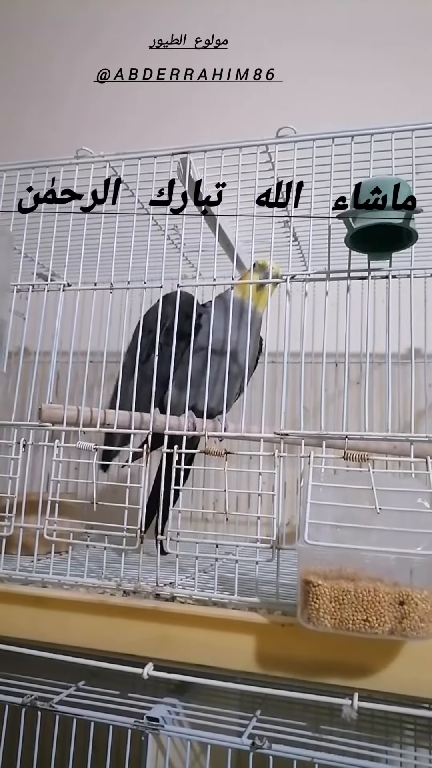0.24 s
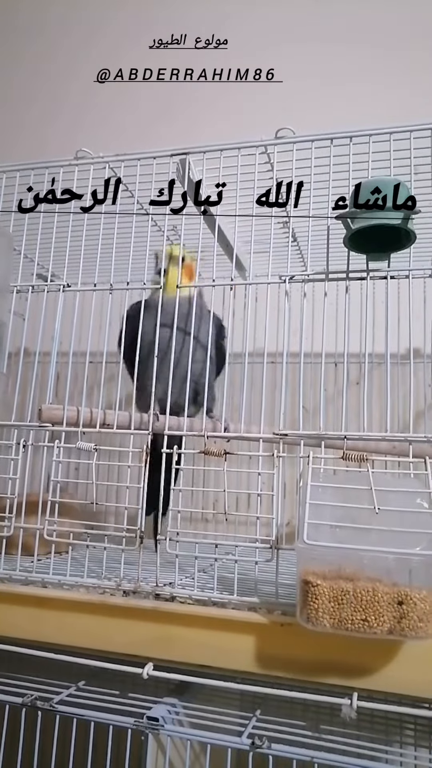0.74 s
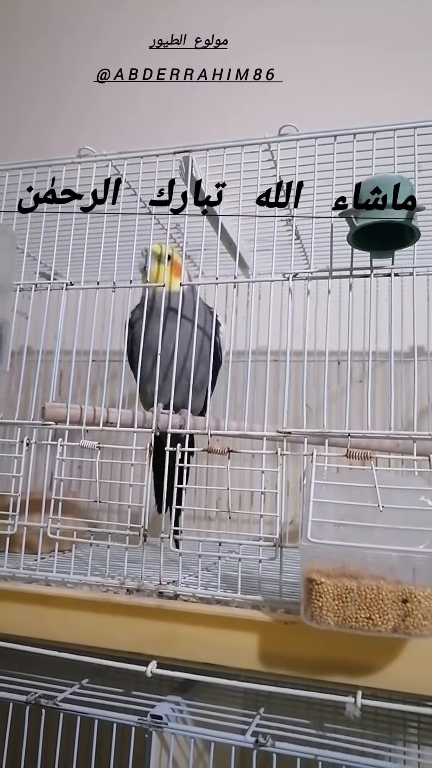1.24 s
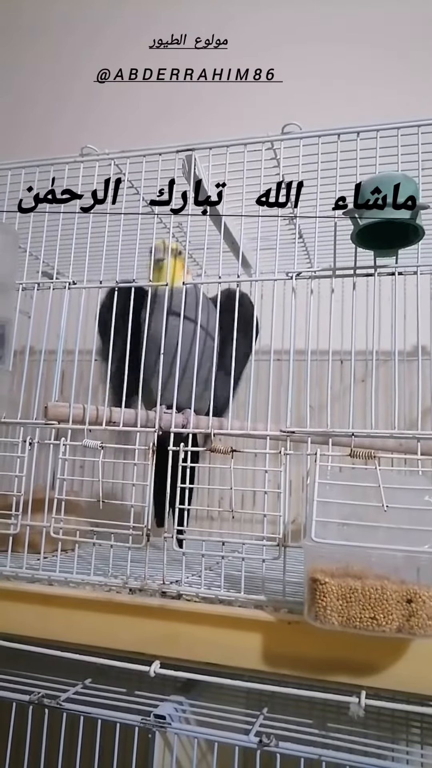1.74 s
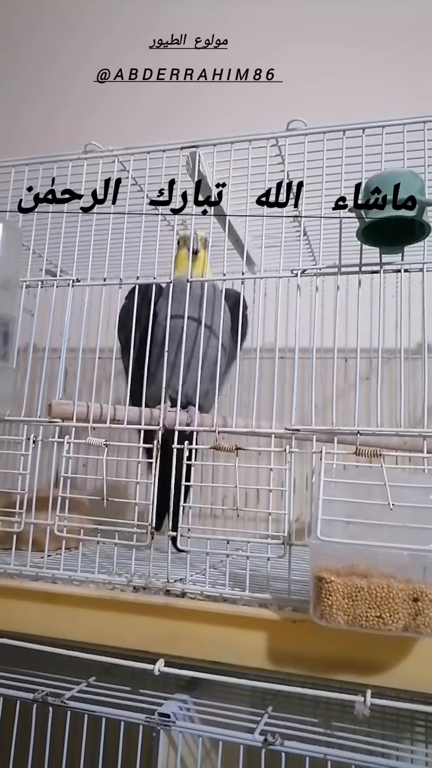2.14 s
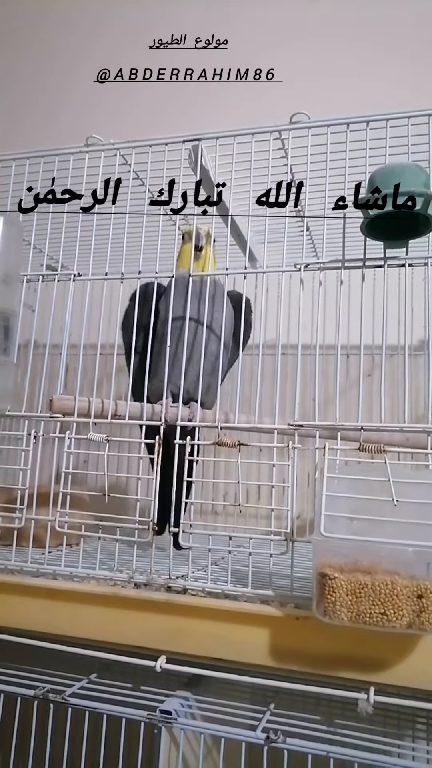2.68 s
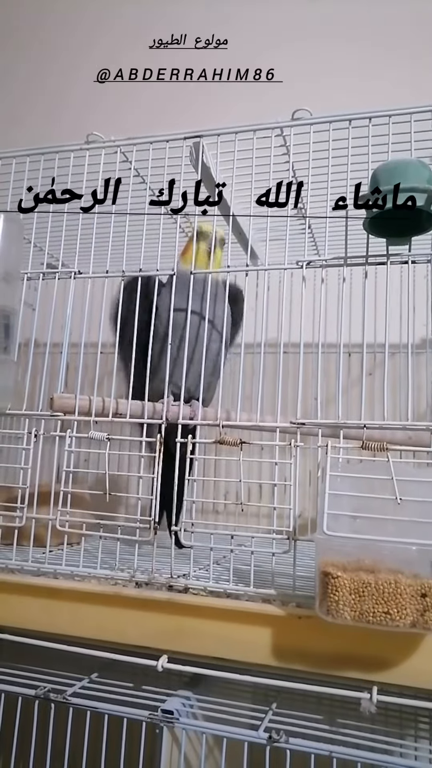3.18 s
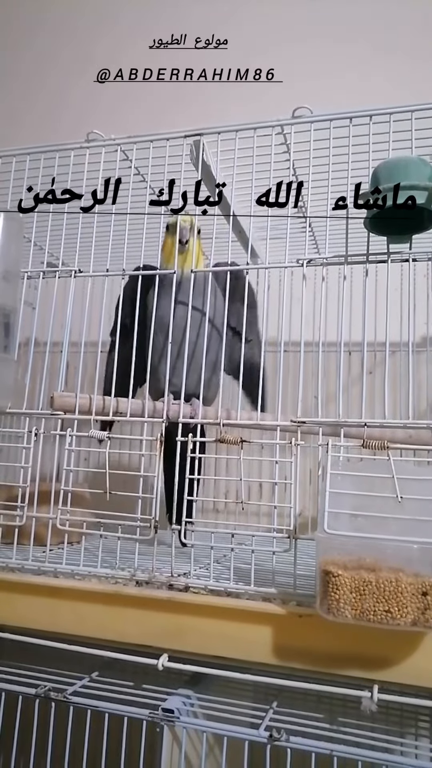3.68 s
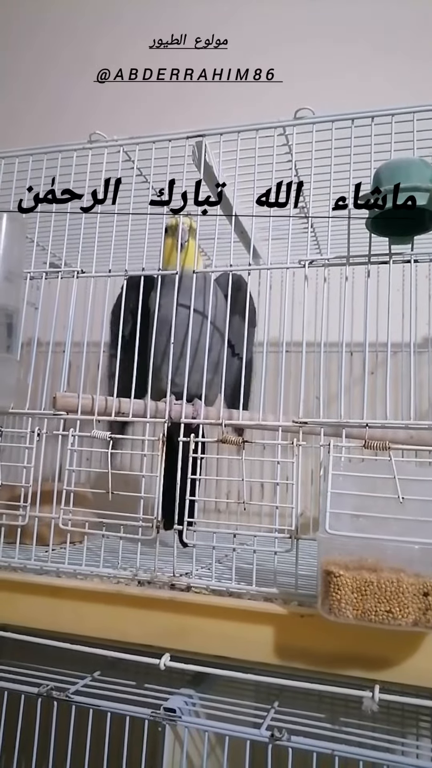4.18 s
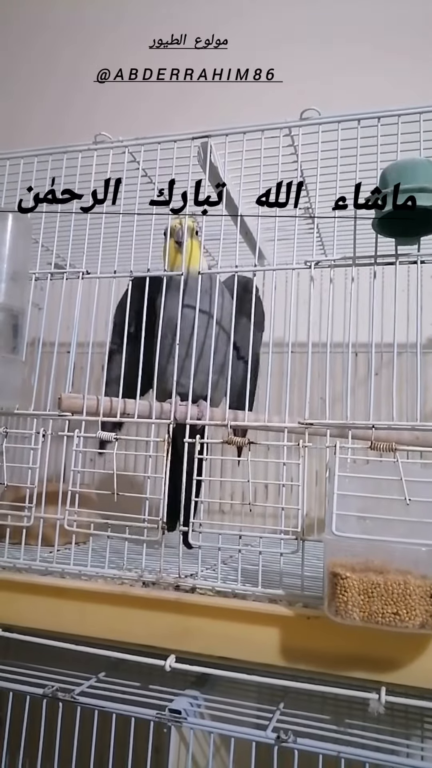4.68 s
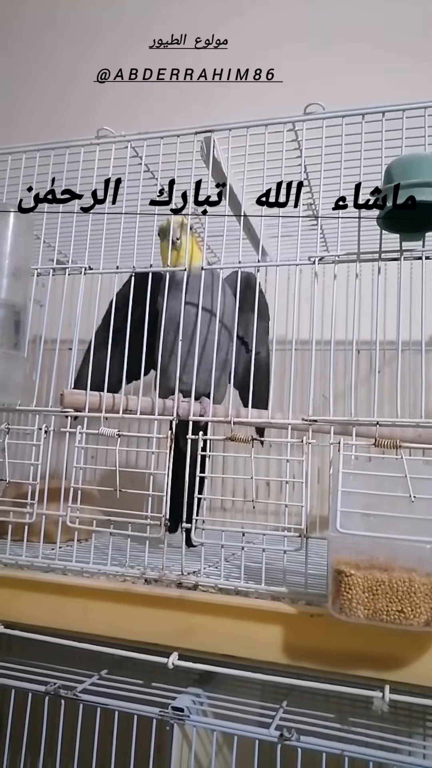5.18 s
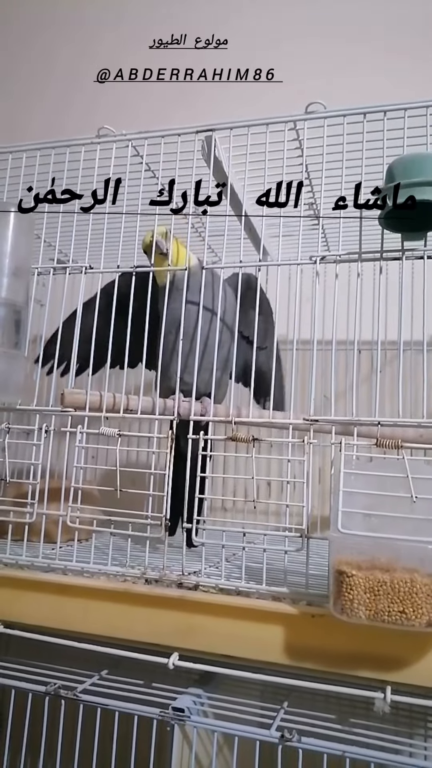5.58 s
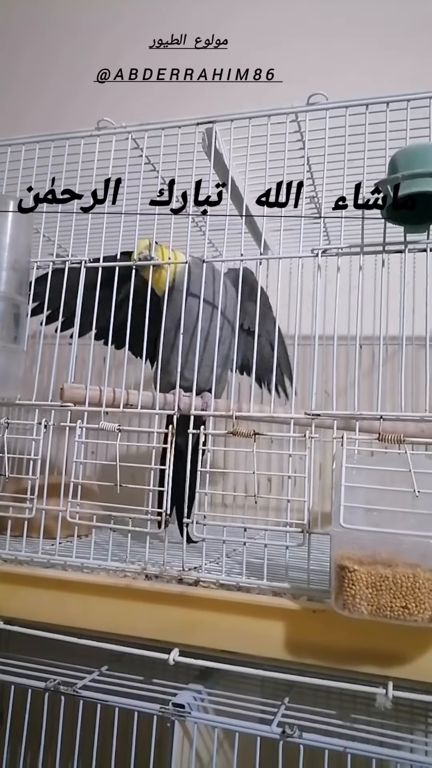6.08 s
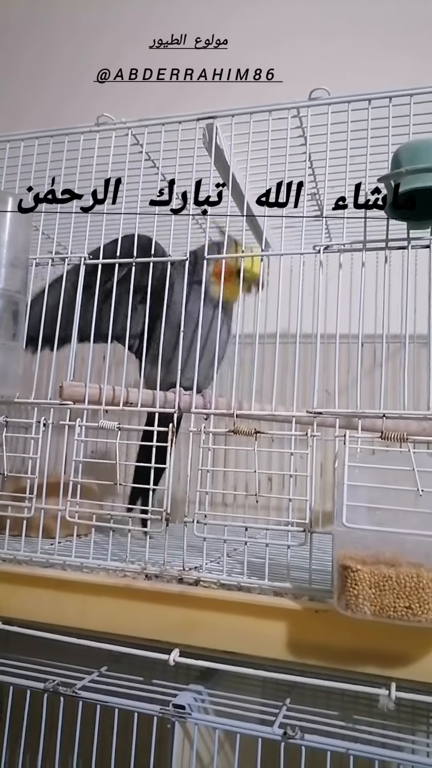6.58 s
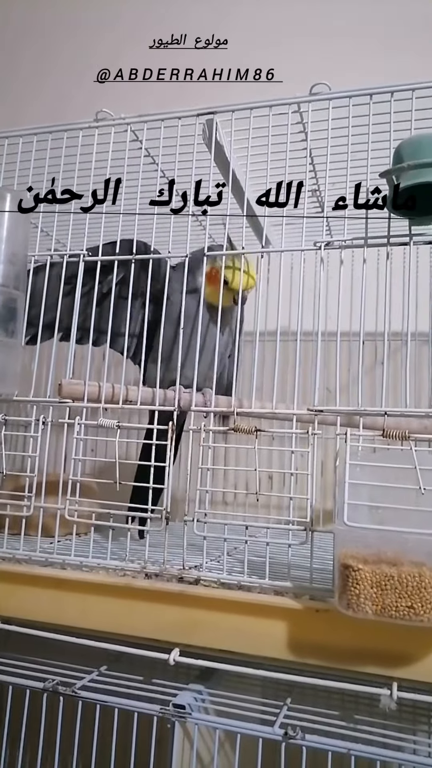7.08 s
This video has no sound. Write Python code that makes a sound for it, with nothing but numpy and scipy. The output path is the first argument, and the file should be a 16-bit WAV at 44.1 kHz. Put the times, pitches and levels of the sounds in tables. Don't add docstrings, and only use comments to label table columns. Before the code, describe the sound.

A cockatiel sings about an arm's length from a stereo phone in a bare, echoing room. At 0 s come two nasal low whistles and a cluck, then a rasp and, from 0.7 to 1.1 s, three bright rising whistles. Warbling and scratchy chatter fill 1.3 to 1.9 s, followed by a clear swelling whistle and a high sagging note near 2.1 s. A loud whistle hits at 2.5 s, another full one at 3.05 s with sharp sizzling chirps, then a strong climbing note at 3.7 s. Loud bursts come at 4.1 and 4.7 s, the latter rising to a peak. From 5 s the song softens, with wobbling notes, rasps and a faint far knock; a stronger knock lands at 5.9 s. High squeaks at 6.4 to 6.7 s and a steady warble at 6.9 s lead to sparse chirps until about 7.3 s. Low household murmur, rumble and thin hiss continue throughout.

```python
import sys
import numpy as np
from scipy import signal
from scipy.fft import rfft, irfft
from scipy.io import wavfile
from scipy.ndimage import uniform_filter1d, minimum_filter1d

SR = 44100
rng = np.random.default_rng(int(sys.argv[2]) if len(sys.argv) > 2 else 0)


def wav_out(sig):
    wavfile.write(sys.argv[1], SR, np.round(np.clip(np.atleast_2d(sig).T, -1, 1) * 32767).astype(np.int16))


def ratio_of_db(decibels):
    return 10 ** (np.asarray(decibels, float) / 20)


N = 323253
t = np.arange(N) / SR
SIDE = np.array([[1], [-1]])


def shaped(x, points):
    hz, db = np.transpose(points)
    f = np.arange(N // 2 + 1) * SR / N + 1
    response_db = np.interp(np.log(f), np.log(hz), db, -90, -90)
    y = irfft(rfft(x) * ratio_of_db(response_db), N)
    return y / y.std()


def band(hz, width_hz):
    lowpass = signal.butter(3, width_hz / 2, fs=SR, output="sos")
    a, b = signal.sosfilt(lowpass, rng.standard_normal((2, N)))
    phase = 2 * np.pi * np.cumsum(hz) / SR
    y = a * np.cos(phase) + b * np.sin(phase)
    return y / y.std()


def walk(rate):
    hold = int(SR / rate)
    steps = np.repeat(rng.standard_normal(N // 40), hold)[:N]
    y = uniform_filter1d(steps, hold)
    return y / y.std()


def gate(start, end, rise, fall):
    opening = np.clip((t - start) / rise, 0, 1)
    return opening * np.clip(1 - (t - end) / fall, 0, 1)


# time in seconds, level in dB.
RUMBLE_LEVEL = [(0.0, -59), (0.33, -62), (0.65, -64.5), (0.9, -71.5), (1.45, -52), (1.69, -65.5),
                (2.04, -62.5), (2.84, -61), (2.88, -63), (3.14, -68), (3.57, -51), (3.82, -74),
                (5.35, -58.5), (5.71, -63), (5.82, -56.5), (6.49, -63.5), (6.7, -79.5), (7.33, -63)]
# time in seconds, length in seconds, swell of the murmur in dB.
STIRRINGS = [(.2, 0.074, 11.5), (0.572, 0.21, 13.5), (1.42, 0.16, 7), (2.054, 0.068, 7), (2.42, 0.09, 12),
             (3.011, 0.14, 14), (3.66, 0.074, 7.5), (4.19, 0.5, 10.5), (5.075, 0.15, 12.5), (5.7, 0.43, 7),
             (5.95, 0.093, 13), (6.865, 0.14, 19), (7.13, 0.16, 13.5)]
# frequency in Hz, level in dB per Hz.
HOUSE_SPECTRUM = [(71, -43), (120, -6), (190, 3), (363, -8), (409, -3.5), (466, -7), (574, -8.5),
                  (1110, -7), (1300, -7.5), (1690, -3), (2860, -120)]
# frequency in Hz, level in dB per Hz.
AIR_SPECTRUM = [(760, -27), (1300, -14), (2070, -4), (3200, -18), (8150, -22.5), (14700, -33), (15500, -72)]


def room_tone():
    rumble_db = np.interp(t, *np.transpose(RUMBLE_LEVEL))
    noise = rng.standard_normal((6, N))
    rumble = shaped(noise[0] + .37 * SIDE * noise[1], [(20, -33), (40, -26.0), (58, -16.5), (110, -36.0)])
    house = shaped(noise[2] + .5 * SIDE * noise[3], HOUSE_SPECTRUM)
    stir_db = sum(db * np.exp(-(2 * (t - s) / length) ** 2) for s, length, db in STIRRINGS)
    house_db = 5 - 66.5 + 0.96 * (rumble_db + 66) + stir_db
    air = shaped(noise[4:], AIR_SPECTRUM) * ratio_of_db(-59 + 0.55 * (house_db + 69.5))
    return rumble * ratio_of_db(rumble_db) + house * ratio_of_db(house_db + 2 * walk(25)) + air


# time in seconds, level in dB.
BLOWS = [
    (5.03, -57),
    (5.922, -40),
]
# frequency in Hz, width in Hz, level in dB, decay by 60 dB in seconds.
FURNITURE_MODES = [(190, 54, 4.5, 0.88), (282, 93, -3.5, 1), (415, 82, 0.5, 0.75), (812, 470, -3.5, 0.89)]


def knocks():
    out = 0
    for hz, width_hz, mode_db, t60 in FURNITURE_MODES:
        ring = band(hz + 0 * t, width_hz)
        for s, db in BLOWS:
            age = np.clip(t - s, 0, None)
            decay = ratio_of_db(db + mode_db - 60 * age / t60)
            out = out + decay * ring * np.clip(age / .012, 0, 1)
    return out


# centre in Hz, decay by 60 dB in seconds, level in dB.
WALL_DECAY = [(1484, 0.64, 14.5), (3000, 0.53, 15), (5560, 0.36, 14.5), (10400, 0.43, 7)]


def room(x):
    age = t[:SR]
    tails = 0
    for hz, t60, db in WALL_DECAY:
        octave = signal.butter(2, [hz / np.sqrt(2), hz * np.sqrt(2)], "band", fs=SR, output="sos")
        noise = signal.sosfilt(octave, rng.standard_normal((2, SR))) * np.exp(-np.log(1000) * age / t60)
        noise = noise * np.clip((age - .003) / 0.0012, 0, 1)
        tails = tails + ratio_of_db(db) * noise / np.sqrt(np.sum(noise ** 2) * SR / 2 / hz / np.sqrt(2))
    return signal.fftconvolve(x[None], tails * np.sqrt(2), axes=1)[:, :N]


# frequency in Hz, width in Hz, share it wanders.
TRACT_MODES = [(3100, 800, .08), (5400, 1500, .075), (8300, 2300, .06), (12400, 4800, .05)]
# start in seconds, length in seconds, throat level in dB,
# gape (beak over throat) in dB, beak resonance in Hz.
CLUCK_CALLS = [(.018, 0.0233, -31.5, -7.5, 5547), (1.25, .028, -36.5, -27, 4480),
               (2.28, 0.0389, -40, -3, 4990), (2.59, 0.044, -38.5, -11, 4378),
               (3.062, 0.04, -39.5, 5, 4414), (4.142, 0.059, -28.5, 1.5, 5404),
               (4.281, 0.1255, -38.5, 10.5, 5280), (5.189, 0.156, -38, -45, 4740),
               (2.72, 0.0078, -29, -6.5, 5000)]
RASP_CALLS = [(.198, 0.11, -39.5, 15, 5130), (1.573, 0.04, -32.5, 10.5, 5740),
              (1.668, 0.11, -37, 7.5, 5600), (1.771, .12, -36.5, 7.5, 5890), (2.038, 0.034, -37, 7.5, 4500),
              (2.338, 0.025, -38, 5.5, 5200), (3.191, 0.061, -30.5, 5, 6030),
              (3.892, 0.14, -35.5, 1.5, 5120), (4.4, 0.05, -31.5, -1.5, 5500), (4.6, 0.1, -35, -6.5, 4604),
              (5.132, 0.041, -21, -12.5, 4700), (5.45, 0.044, -43.5, 9.5, 5140),
              (5.633, 0.072, -36.5, 11, 5540), (6.929, 0.22, -50, 6, 4440)]
SIZZLE_CALLS = [(.458, 0.0521, -36, -3.5, 5783), (1.358, 0.14, -38.5, -1, 4146),
                (2.818, 0.0192, -49, 13, 4837), (2.85, 0.0806, -41, 0, 4700),
                (3.108, 0.032, -22.5, -25, 7173), (3.46, 0.018, -27, -48, 4336),
                (4.853, 0.098, -52, 13, 4815), (5.348, .1, -45.5, 5.5, 4415), (5.592, 0.049, -38, 0, 6370),
                (5.83, 0.049, -49.5, 5.5, 5680), (6.188, 0.0254, -38, -0.5, 5490),
                (6.42, .04, -55, 2.5, 5630), (6.832, 0.046, -39.5, 5, 4860), (7.12, 0.031, -36, -1.5, 5490),
                (7.31, 0.026, -43.5, 10, 5550)]


def chatter():
    flap = np.cumsum(260 * (1 + .35 * walk(120))) / SR % 1
    puffs = uniform_filter1d(.5 + np.exp(-flap / .4), 20) * ratio_of_db(2.5 * walk(70))
    kinds = [(CLUCK_CALLS, -13.5), (RASP_CALLS, -8.5), (SIZZLE_CALLS, 0.38)]
    calls = sorted((*row, upper_db) for rows, upper_db in kinds for row in rows)
    effort = np.zeros((len(TRACT_MODES), N))
    for s, length, throat_db, gape_db, _, upper_db in calls:
        beak_db = throat_db + gape_db
        upper_beak_db = beak_db + upper_db
        hiss_db = min(upper_beak_db - 3, -40.5)
        levels_db = np.array([throat_db, beak_db, upper_beak_db, hiss_db]) - 5
        envelope = gate(s, s + 0.69 * length, 0.038 * length + 0.0027, 1.03 * length)
        effort += np.outer(ratio_of_db(levels_db), envelope)
    centres = [hz + 0 * t for hz, _, _ in TRACT_MODES]
    middles = [s + length / 2 for s, length, *_ in calls]
    centres[1] = np.interp(t, middles, [call[4] for call in calls])
    out = 0
    for strength, hz, (_, width_hz, wander) in zip(effort, centres, TRACT_MODES):
        wandering_hz = hz * np.exp(1.3 * wander * walk(45))
        out = out + strength * ratio_of_db(2 * walk(45)) * band(wandering_hz, 0.96 * width_hz)
    out = out * puffs / np.sqrt(np.mean(puffs ** 2))
    return signal.sosfilt(signal.butter(4, 1900, "high", fs=SR, output="sos"), out)


PORT_LAG = 6
# pitch in Hz, left minus right level in dB.
PORT_SHADING = [(1450, 3), (1650, -23.5), (1900, -16.5), (2150, -2), (2600, 16.5), (3300, 7), (4400, -20.5),
                (8000, -1.5)]


def shading_db(hz):
    return np.interp(hz, *np.transpose(PORT_SHADING))


def syrinx(on, end, hz, db, ease_db, chance, shake, over_db, fade):
    tremble, swell, leak = chance
    phase = 2 * np.pi * np.cumsum(hz * (1 + shake * tremble[on])) / SR
    high = np.arange(5, 9)
    sheen_db = -32 - .003 * abs(high * hz.mean() - 13800)
    over_db = [0, *over_db, *np.maximum(over_db[-1] - 5.2 * (high - 4), sheen_db)]
    ease_db = ease_db - 60 * np.clip(t[on] - end, 0, None) / fade
    tone = 0
    for k, partial_db in enumerate(over_db, 1):
        if k * hz.max() < .4 * SR:
            easing_db = min(k - 1, 2) * .3 * ease_db
            port_db = SIDE / 2 * shading_db(k * hz)
            tone = tone + ratio_of_db(partial_db + easing_db + port_db) * np.sin(k * phase)
    strength = ratio_of_db(db + ease_db + (1.2 + 40 * shake) * swell[on])
    envelope = gate(t[on.start], end + .5 * fade, .004, .1 * fade)[on]
    return (tone * np.sqrt(2) + leak[on]) * strength * envelope


def whistle(row, chance, bend, dip, shake, peak, in_db, out_db, over_db, fade):
    s, length, first_hz, last_hz, db = row
    on = slice(int(s * SR), int((s + length + .6 * fade) * SR))
    u = np.clip((t[on] - s) / length, 0, 1)
    glide_hz = last_hz + (first_hz - last_hz) * (1 - u) ** bend
    hz = glide_hz * (1 - dip * np.sin(np.pi * u))
    ease_db = np.interp(u, [0, np.clip(peak, .05, .95), 1], [in_db, 0, out_db])
    return on, syrinx(on, s + length, hz, db, ease_db, chance, shake, over_db, fade)


def long_note(line, chance, shake, over_db, fade):
    s, hz, db = np.transpose(line)
    left = ratio_of_db(shading_db(hz) / 2)
    port_sum = left + np.exp(2j * np.pi * hz * PORT_LAG / SR) / left
    db = db - 20 * np.log10(abs(port_sum) / 2)
    on = slice(int(s[0] * SR), int((s[-1] + .6 * fade) * SR))
    ease_db = np.interp(t[on], s, db - db.max())
    return on, syrinx(on, s[-1], np.interp(t[on], s, hz), db.max(), ease_db, chance, shake, over_db, fade)


# start in seconds, length in seconds, first pitch in Hz, last pitch in Hz,
# level in dB.
BRIGHT_NOTES = [(.686, .075, 1797, 2110, -29.5), (1.065, .085, 1760, 2046, -33)]
CLIMBING_NOTES = [(.858, 0.09, 1985, 2187, -29)]
ARCHED_NOTES = [(4.87, 0.21, 4690, 4950, -43.5)]
NASAL_NOTES = [(0.0, .03, 1640, 1506, -31.5), (.045, .075, 1320, 1466, -24)]
SHRILL_NOTES = [(7.196, 0.0556, 2613, 2684, -43.5), (7.31, 0.019, 2280, 2395, -44)]
SQUEAKY_NOTES = [(6.436, 0.046, 3110, 3204, -28.5)]
FLICKED_NOTES = [(.95, 0.015, 2190, 1820, -52), (6.663, 0.012, 3150, 2264, -32.5)]
RISING_NOTES = [(4.52, 0.064, 3330, 3455, -28.5)]
HOARSE_NOTES = [(.46, 0.1, 1680, 2130, -48), (.535, 0.35, 3000, 3140, -50), (.75, 0.117, 3000, 2910, -54),
                (1.0, 0.29, 3220, 2840, -54.5), (2.285, 0.084, 5120, 5200, -49),
                (2.31, 0.061, 2656, 2520, -46.5), (2.6, 0.066, 2500, 2900, -48),
                (2.7, 0.014, 1370, 1365, -44.5), (2.78, .07, 3580, 3800, -41),
                (3.068, 0.028, 4450, 4250, -38), (3.105, 0.061, 3510, 3450, -34),
                (3.135, 0.059, 3000, 2860, -40), (3.13, 0.116, 2725, 2590, -39.5),
                (3.38, 0.094, 2620, 3000, -60), (3.46, 0.011, 4260, 4450, -40),
                (3.64, 0.053, 3140, 4300, -45), (4.38, 0.034, 4050, 3950, -36),
                (4.615, 0.059, 3310, 3050, -35), (4.858, 0.11, 4040, 4340, -39.5),
                (5.15, .04, 2940, 2980, -50), (5.18, .07, 3570, 3510, -39), (5.255, .045, 3000, 3060, -40),
                (5.34, 0.095, 3160, 3600, -43), (5.4, 0.041, 5150, 5250, -40),
                (5.585, 0.056, 3000, 4470, -45), (5.622, 0.015, 3310, 3350, -31),
                (6.587, 0.019, 4880, 4930, -52), (6.93, 0.086, 3707, 3680, -29.5)]
# time in seconds, pitch in Hz, level in dB.
CLEAR_LINES = [
    [(1.845, 2030, -34), (1.861, 1880, -31.5), (1.905, 2022, -19), (1.993, 2011, -37.5), (2.005, 2000, -44),
     (2.021, 2022, -31), (2.08, 1994, -54.5)],
    [(2.38, 1960, -37.5), (2.402, 1797, -34), (2.426, 1770, -26), (2.436, 1636, -27.5), (2.484, 1867, -13),
     (2.518, 1886, -17), (2.56, 1884, -36)],
    [(2.983, 1916, -40), (3.025, 1840, -17), (3.055, 1956, -13.5), (3.095, 1953, -17.5), (3.103, 1857, -21),
     (3.119, 1980, -23.5), (3.135, 2031, -32.5)],
    [(4.005, 1720, -37), (4.015, 1850, -40.5), (4.049, 1670, -30.5), (4.075, 1793, -20.5),
     (4.101, 1783, -10.5), (4.115, 1730, -29), (4.13, 1772, -30)],
    [(4.44, 1957, -36), (4.474, 2004, -30.5), (4.496, 2153, -16.5), (4.532, 2090, -26.5),
     (4.54, 2015, -30.5), (4.582, 2147, -21.5), (4.592, 2135, -42.5)],
    [(4.605, 2044, -33), (4.655, 2252, -27), (4.671, 2250, -31), (4.717, 2505, -8.5), (4.759, 2578, -39),
     (4.787, 2488, -26.5), (4.81, 2528, -37.5)],
    [(4.935, 1935, -39), (4.963, 1858, -29.5), (4.989, 1930, -25), (5.007, 1880, -21), (5.025, 1802, -19),
     (5.035, 1710, -22), (5.06, 1850, -37)],
    [(5.425, 2070, -41), (5.439, 2052, -32), (5.461, 2090, -26), (5.487, 1997, -27), (5.505, 2107, -30),
     (5.601, 2017, -34.5), (5.628, 2070, -43)],
    [(5.778, 1850, -36), (5.792, 1838, -35.5), (5.824, 1870, -32), (5.848, 1878, -25), (5.878, 1860, -22),
     (5.888, 1788, -32.5), (5.91, 1867, -38)],
]
WARBLED_LINES = [
    [(1.362, 1760, -40), (1.368, 1737, -37.5), (1.404, 1800, -34), (1.414, 1657, -30.5),
     (1.456, 1660, -22.5), (1.482, 1680, -34), (1.486, 1638, -33), (1.542, 1610, -36), (1.56, 1562, -46)],
    [(3.46, 1903, -33), (3.472, 2020, -33.5), (3.478, 1852, -39), (3.498, 1564, -32.5), (3.58, 1565, -28.5),
     (3.61, 1410, -31.5), (3.624, 1462, -36), (3.632, 1740, -31), (3.636, 1830, -42.5)],
    [(4.195, 2077, -34), (4.223, 2060, -32.5), (4.233, 2370, -26), (4.241, 2410, -37), (4.259, 2210, -24),
     (4.271, 2070, -34.5), (4.287, 2320, -28.5), (4.309, 2097, -28.5), (4.315, 2340, -40)],
    [(5.14, 1920, -38), (5.158, 2148, -31), (5.182, 2070, -32), (5.214, 2177, -18.5), (5.224, 2310, -44),
     (5.234, 2160, -33), (5.262, 2390, -25), (5.31, 2277, -34.5), (5.335, 2318, -45)],
    [(6.89, 2027, -44), (6.898, 1932, -23), (6.904, 1923, -23.5), (6.916, 2114, -27), (6.926, 2060, -24),
     (6.938, 2127, -26), (6.958, 2131, -22.5), (7.034, 2111, -24), (7.12, 2117, -40.5)],
]
HIGH_LINES = [
    [(2.085, 3690, -36), (2.091, 3637, -35), (2.129, 3642, -27.5), (2.139, 3370, -28), (2.161, 3494, -21),
     (2.173, 3410, -57), (2.191, 3500, -39), (2.245, 3480, -40), (2.25, 3455, -36)],
    [(3.67, 2425, -25.5), (3.694, 2750, -28), (3.712, 2685, -22), (3.738, 3030, -19.5), (3.752, 3064, -18),
     (3.766, 2956, -31), (3.78, 3048, -18.5), (3.852, 3062, -31.5), (3.865, 3130, -38)],
    [(6.579, 3540, -40), (6.589, 3380, -28.5), (6.615, 3426, -19), (6.625, 3364, -22), (6.639, 3396, -20.5),
     (6.667, 3180, -17.5), (6.673, 3377, -41), (6.679, 3307, -24), (6.74, 3309, -31.5)],
    [(6.195, 2510, -35), (6.203, 2520, -40), (6.213, 2430, -35), (6.217, 2685, -48), (6.223, 2921, -32),
     (6.231, 3350, -51), (6.237, 3280, -42), (6.245, 3199, -37), (6.275, 3263, -57)],
    [(2.722, 3760, -39), (2.732, 3710, -31.5), (2.744, 3770, -28), (2.758, 3457, -39), (2.772, 3540, -49),
     (2.78, 3490, -52), (2.79, 3715, -50)],
]


def whistles():
    short_kinds = [
        (BRIGHT_NOTES, dict(bend=2.4, dip=0, shake=0.0078, peak=0.72, in_db=-7, out_db=-7.5,
                            over_db=[7, 0.5, -3.5], fade=0.81)),
        (CLIMBING_NOTES, dict(bend=0.99, dip=0, shake=0.0081, peak=0.8, in_db=-3.5, out_db=-9,
                              over_db=[4.5, 0, -7.5], fade=0.62)),
        (ARCHED_NOTES, dict(bend=2.1, dip=-0.11, shake=.032, peak=0.34, in_db=-1, out_db=-11,
                            over_db=[-16, -6, -38], fade=0.088)),
        (NASAL_NOTES, dict(bend=2.43, dip=0, shake=0.01, peak=0.94, in_db=-6, out_db=-7,
                           over_db=[-2, -36, -27], fade=0.14)),
        (SHRILL_NOTES, dict(bend=3.5, dip=0, shake=0.031, peak=0.091, in_db=3, out_db=0,
                            over_db=[9.5, 6, -2], fade=0.44)),
        (SQUEAKY_NOTES, dict(bend=1.78, dip=0, shake=0.02, peak=0.58, in_db=-5.5, out_db=-5,
                             over_db=[-10, -9.5, -22], fade=0.25)),
        (FLICKED_NOTES, dict(bend=0.97, dip=0, shake=0.0015, peak=0.19, in_db=-1, out_db=5,
                             over_db=[-21.5, -30, -31], fade=0.02)),
        (RISING_NOTES, dict(bend=2.1, dip=0, shake=0.0045, peak=0.52, in_db=3, out_db=-6,
                            over_db=[-21, -31, -49], fade=0.15)),
        (HOARSE_NOTES, dict(bend=1.6, dip=0, shake=0.03, peak=0.28, in_db=3, out_db=0,
                            over_db=[-17.5, -43, -23.5], fade=0.19)),
    ]
    long_kinds = [
        (CLEAR_LINES, dict(shake=0.0046, over_db=[-27.5, -27.5, -51], fade=0.5)),
        (WARBLED_LINES, dict(shake=0.008, over_db=[-27.5, -24.5, -55], fade=0.27)),
        (HIGH_LINES, dict(shake=.005, over_db=[-29, -40.5, -60], fade=0.22)),
    ]
    leak = ratio_of_db(-37.5) * band(4000 + 0 * t, 4000)
    chance = (walk(400), walk(90), leak)
    notes = [whistle(row, chance, **manner) for rows, manner in short_kinds for row in rows]
    notes += [long_note(line, chance, **manner) for lines, manner in long_kinds for line in lines]
    out = np.zeros((2, N))
    for on, note in notes:
        out[:, on] += note
    return out


def gain_control(x):
    knee_db, squeeze = -30, 0.13
    level_db = 10 * np.log10(uniform_filter1d(x ** 2, 600) + 1e-9)
    held_db = minimum_filter1d(-squeeze * np.clip(level_db - knee_db, 0, None), 1500)
    return ratio_of_db(uniform_filter1d(held_db, 1500, origin=500))


def scene():
    song, rasp = whistles(), chatter()
    bird = song + rasp
    direct = np.array([bird[0], np.roll(bird[1], PORT_LAG)])
    gain = gain_control(bird.mean(0))
    to_walls = ratio_of_db(-16) * song.mean(0) + rasp
    echoes = room(to_walls / gain)
    return direct + ratio_of_db(-13) * gain * echoes + knocks() + room_tone()


# frequency in Hz, threshold in dB.
DROPOUT_LEVEL = [(3000, -20), (7500, -12), (10000, -1.4), (14000, -.2)]


def drop_faint_bands(x):
    mask_db, cut_db = -43, -28
    spec = signal.stft(x, nperseg=1024)[2]

    def smooth_db(bins, frames):
        power = uniform_filter1d(abs(spec) ** 2, bins, axis=1)
        return 10 * np.log10(uniform_filter1d(power, frames, axis=2) + 1e-14)

    level_db = smooth_db(10, 3)
    loudest_db = -minimum_filter1d(-level_db, 36, origin=13, axis=1)
    masked = 1 / (1 + np.exp(np.clip(level_db - loudest_db - mask_db, -40, 40)))
    masked[:, :30] = 0
    under_db = np.interp(np.arange(513) * SR / 1024, *np.transpose(DROPOUT_LEVEL), left=-99)[:, None]
    weak = (smooth_db(5, 4) - smooth_db(30, 4)).mean(0) < under_db
    kept = spec * ratio_of_db(cut_db * np.maximum(masked, weak))
    return signal.istft(kept, nperseg=1024)[1][:, :N]


def top_cut(x):
    return signal.sosfilt(signal.butter(12, 15770, fs=SR, output="sos"), x)


def record(dry):
    lowpass = signal.ellip(6, .3, 40, 15250, fs=SR, output="sos")
    mix = signal.sosfilt(lowpass, drop_faint_bands(dry))
    return top_cut(mix)


dry = scene()
out = record(dry)
wav_out(out)
```